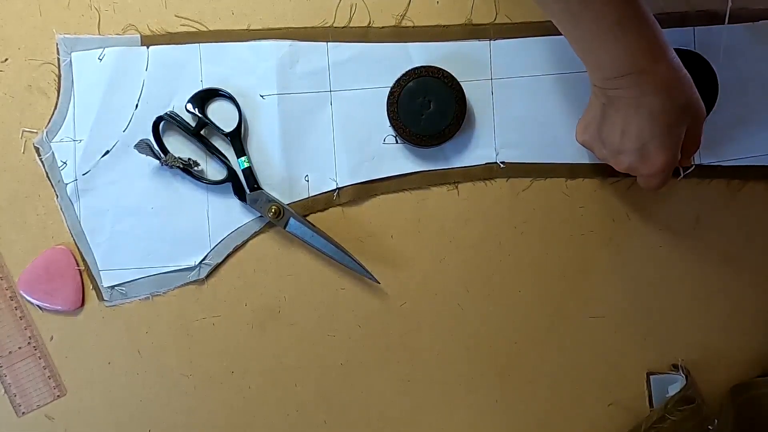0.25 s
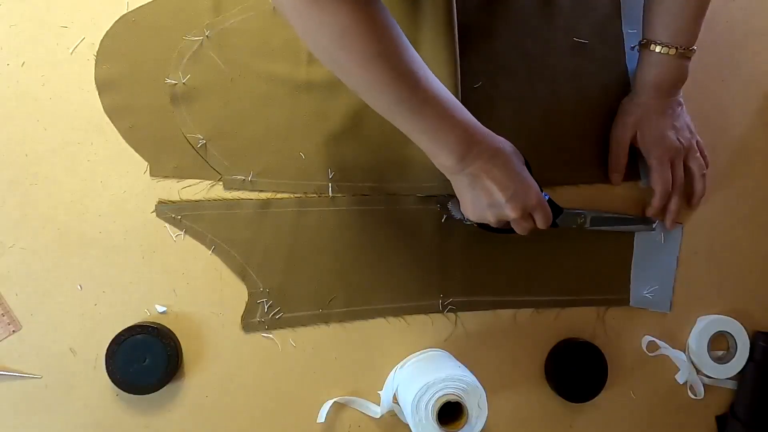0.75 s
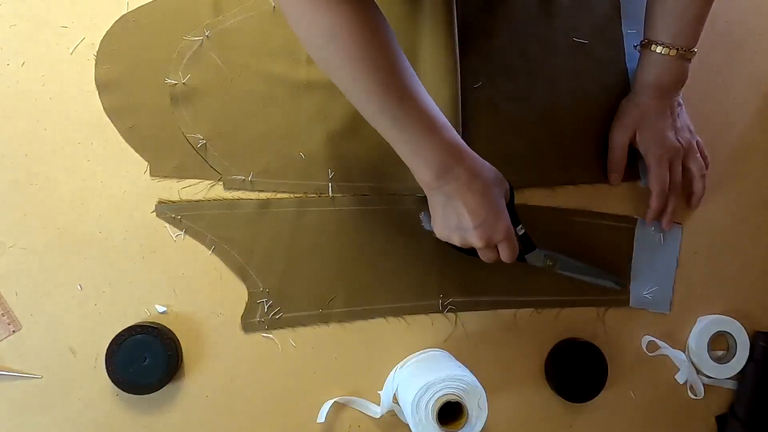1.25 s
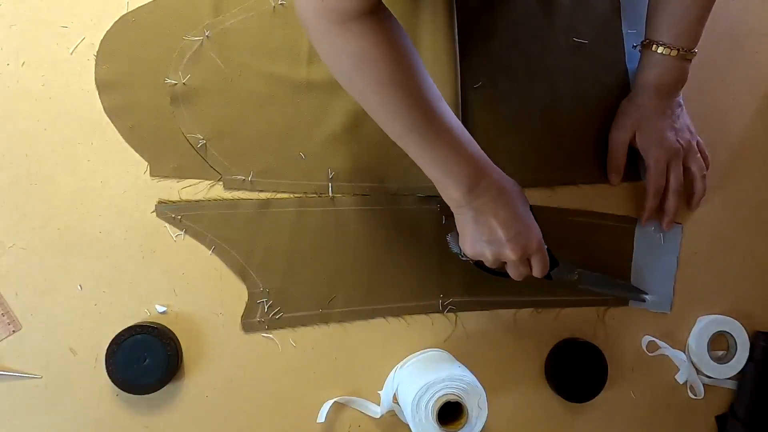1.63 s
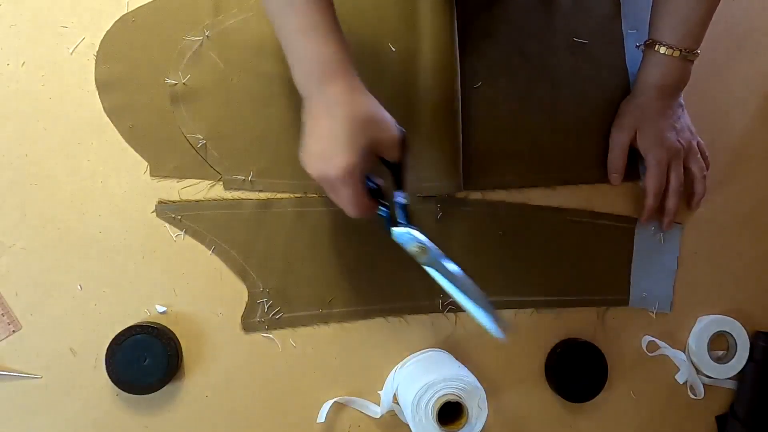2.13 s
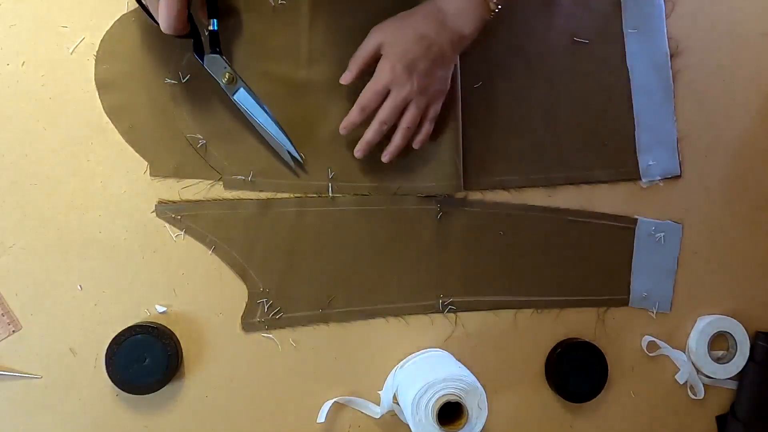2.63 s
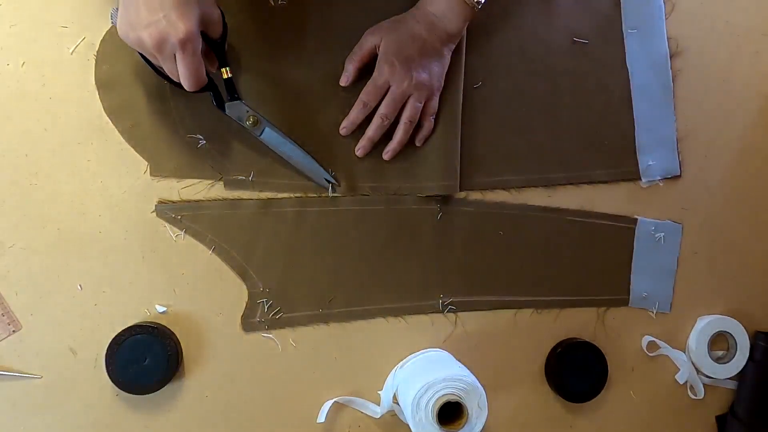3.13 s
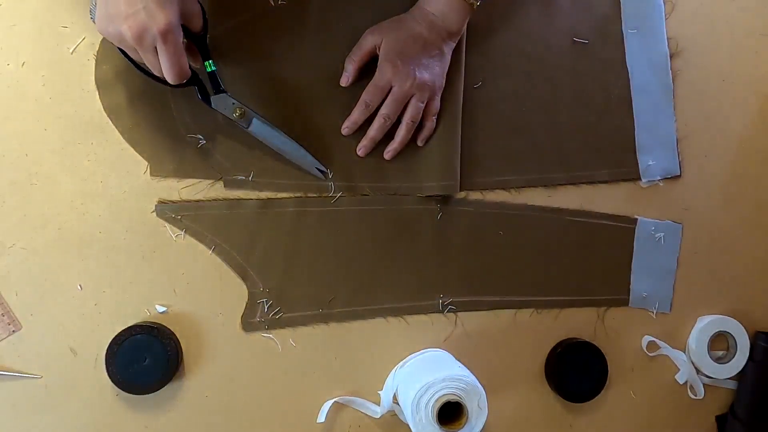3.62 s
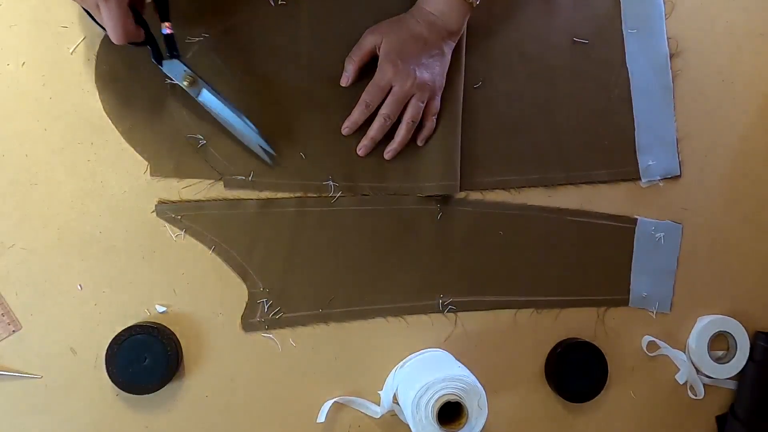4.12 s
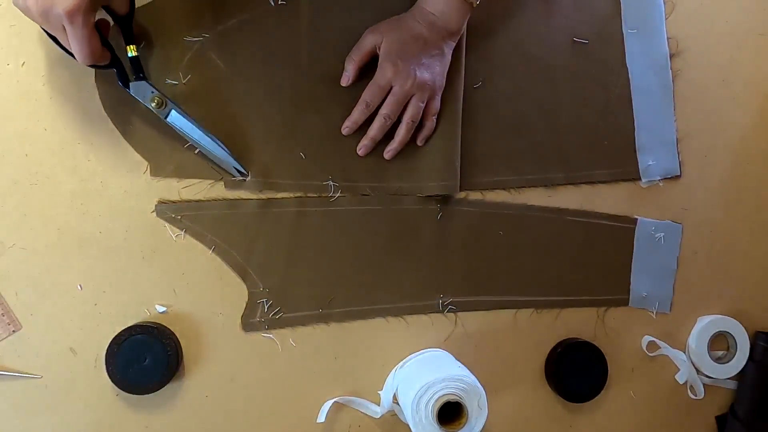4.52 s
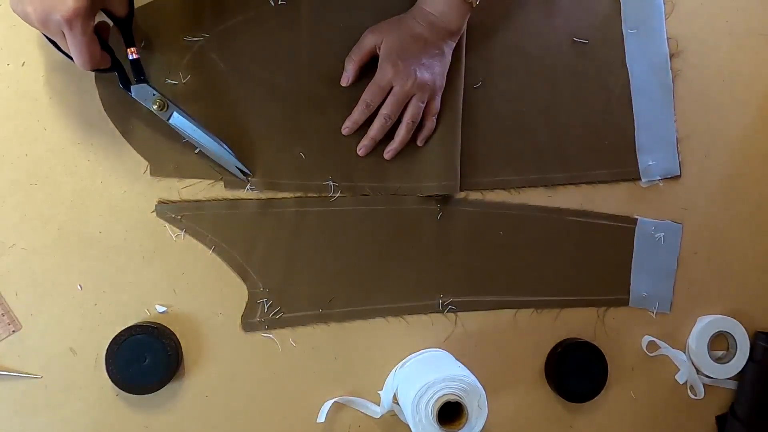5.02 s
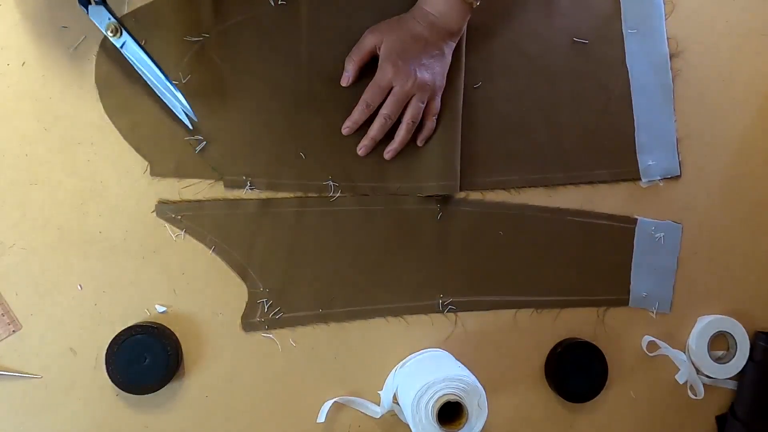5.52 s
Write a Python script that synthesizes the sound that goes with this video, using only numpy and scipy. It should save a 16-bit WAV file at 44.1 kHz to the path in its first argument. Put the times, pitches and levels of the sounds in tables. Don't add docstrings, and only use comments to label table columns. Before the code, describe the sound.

Sharp, dry scissor snips at uneven intervals, each followed by a brief steel scrape, over dull table knocks and faint fabric brushing indoors.

```python
import sys
import numpy as np
from scipy import signal
from scipy.fft import rfft, irfft
from scipy.io import wavfile
from scipy.ndimage import uniform_filter1d

SR = 44100
rng = np.random.default_rng(int(sys.argv[2]) if len(sys.argv) > 2 else 0)


def bounce(signal):
    frames = np.transpose(np.atleast_2d(signal))
    limited = np.clip(frames, -1, 1)
    pcm = np.round(limited * 32767).astype(np.int16)
    wavfile.write(sys.argv[1], SR, pcm)


def volts_from_db(level):
    exponent = np.asarray(level, float) / 20
    return 10 ** exponent


N = 254016

# time in seconds, peak level in dB,
# then the levels in dB against the middle blade modes of the handles (lowest modes), the blade roots (next
SNAPS = [
    (0.4736, -22.5, -12, -11, -1.5),
    (1.0983, -31.5, -9.5, -9.5, -0.5),
    (1.3701, -37.5, -34, -24.5, -1.5),
    (2.0033, -21.5, -13.5, -14, -1.5),
    (3.3893, -43, -4, -6, -2.5),
    (4.0598, -26, -17.5, -10.5, 2),
    (4.8918, -31.5, -19, -11.5, 2),
    (5.3669, -26, -15, -11, 4),
]
# frequency in Hz, level in dB, t60 in seconds, left minus right in dB.
BLADE_MODES = [(1020, -41.5, 0.036, 11), (1320, 2, 0.012, -3.5), (1674, 8, 0.0077, -1),
               (2173, 5, 0.016, 9.5), (2386, 10, 0.017, 1.5), (2572, 12.5, 0.0069, 2),
               (3236.5, -1.5, 0.017, 25), (3785, -6.5, 0.008, 12), (3990, 0, 0.054, 2.5),
               (4453, 2.5, 0.011, 4.5), (4730, 4.5, 0.01, 3.5), (5090, 1, 0.0151, 0.5),
               (5840, -1.5, 0.0109, 1), (6710, 3.5, .025, 1), (7043, -5.5, 0.0087, 19.5),
               (7670, -3, 0.0099, 13), (8537, 1.5, 0.016, -7), (8840, 5.5, 0.0095, -1.5),
               (9700, -1, .01, 1), (10330, -8.5, 0.024, -17.5), (12110, -5.5, 0.0088, -10.5),
               (14800, -20.5, .005, -17.5), (14100, -24.5, .004, -18.5)]
# time in seconds, delay of the left port in seconds.
PORT_LAG = [(0, 0.000061), (2.2, 0.000063), (2.8, 0.000045), (5.76, 0.000012)]


def clock():
    return np.arange(N) / SR


def unit(x):
    return x / np.sqrt(np.mean(x ** 2))


def curve(rows):
    rows = np.array(rows)
    out = np.zeros(N)
    span = slice(int(rows[0, 0] * SR), int(rows[-1, 0] * SR) + 1)
    out[span] = volts_from_db(np.interp(clock()[span], rows[:, 0], rows[:, 1]))
    return out


def strokes(times, db, rise_s, fall_s):
    out = np.zeros(N)
    for s, peak, up, down in np.broadcast(times, volts_from_db(db), rise_s, fall_s):
        first = max(int((s - 8 * up) * SR), 0)
        last = min(int((s + 8 * down) * SR), N)
        span = np.arange(first, last)
        growth = np.exp((s - span / SR) / up)
        decay = np.exp((span / SR - s) / down)
        out[span] += 2 * peak / (growth + decay)
    return out


def flicker(rate_hz, db):
    k = int(SR / rate_hz)
    held = np.repeat(rng.standard_normal(N // k + 1), k)
    return volts_from_db(db * uniform_filter1d(held, k)[:N])


def pair(alike):
    alike = np.clip(alike, 0, 1)
    mid, side = rng.standard_normal((2, N))
    return np.sqrt(1 + alike) * mid + np.sqrt(1 - alike) * side * np.array([[1], [-1]])


def colour(x, points):
    hz, db = np.transpose(points)
    log_f = np.log(np.fft.rfftfreq(N, 1 / SR) + 1)
    return irfft(rfft(x) * volts_from_db(np.interp(log_f, np.log(hz), db)), N)


def band(x, lo_hz, hi_hz):
    return signal.sosfilt(signal.butter(2, [lo_hz, hi_hz], "bandpass", fs=SR, output="sos"), x)


def ring(x, hz, *t60):
    shrink = np.log(1000) / (np.maximum(t60, .002) * SR)
    poles = np.exp(2j * np.pi * hz / SR - shrink)
    return signal.lfilter([np.prod(1 - np.abs(poles[1:]))], np.poly(poles), x)


def air():
    # frequency in Hz, level in dB per Hz.
    room_spectrum = [(88, -42), (150, -3.5), (216, -12.5), (262, -11), (495, -13.5), (802, -24.5),
                     (991, -18.5), (3030, -36), (3340, -43.5), (7500, -38.5), (15000, -55.5)]
    # frequency in Hz, left minus right in dB.
    ear_balance = [(60, -5.5), (110, 0), (200, -3.5), (380, -5), (700, -3), (1290, -3), (2380, 5.5),
                   (4400, 9.5), (8120, 0.5), (15000, -4)]
    hush = unit(colour(pair(0.24), room_spectrum)) * volts_from_db(-73 + 6.5) * flicker(4.8, 1.5)
    ears = []
    for noise, sign in zip(hush, (1, -1)):
        ears.append(colour(noise, [(hz, sign * db / 2) for hz, db in ear_balance]))
    return np.array(ears)


def cloth():
    # frequency in Hz, level in dB per Hz.
    fibre_spectrum = [(290, -43.5), (500, -12.5), (661, -13), (898, -12), (1000, -7.5), (1090, -7.5),
                      (1780, -7), (1930, -10), (2190, -9), (2900, -12.5), (4920, -10.5), (10300, -25),
                      (14000, -43.5)]
    # frequency in Hz, bandwidth in Hz, level in dB.
    fold_modes = [(987, 36, -2.5), (1534, 200, -3.5), (2003, 85, -2), (3220, 150, -1)]
    # peak time in seconds, length in seconds, level in dB, hiss against drag in dB.
    drag_events = [(0.053, 0.05, -82.5, 13), (0.483, 0.063, -61, -37), (0.735, 0.26, -72, 2.5),
                   (1.255, 0.055, -70.5, -1), (1.593, 0.15, -71.5, -3), (2.108, 0.25, -88.5, 6.5),
                   (2.44, .12, -58.5, -3.5), (2.617, 0.11, -64.5, -8), (2.94, 0.059, -76.5, -4),
                   (3.431, 0.26, -79.5, -11), (4.41, .1, -90.5, 18), (4.696, .1, -91, 7.5),
                   (5.119, .08, -93, 4), (5.368, 0.056, -66, -20.5)]
    s, length, db, hiss_db = np.transpose(drag_events)
    rise, fall = 0.61 * length, 0.77 * length
    drag = volts_from_db(-89.5) + strokes(s, db, rise, fall)
    hiss = volts_from_db(-85.5) + strokes(s - 0.86 * length, db + hiss_db, rise, fall)

    fibres = colour(pair(0.36) * flicker(170, 1.4), fibre_spectrum)
    dull = signal.lfilter(*signal.butter(2, 3000, "low", fs=SR), fibres)
    bright = signal.lfilter(*signal.butter(2, 3000, "high", fs=SR), fibres)
    folds = 0
    for hz, width, fold_db in fold_modes:
        tone = ring(dull, hz, .004 + 1 / width).imag
        folds = folds + volts_from_db(fold_db) * flicker(9, 2.5) * unit(tone)
    low = (unit(dull) + volts_from_db(-11) * folds) * drag * flicker(14, .8)
    high = unit(bright) * hiss * flicker(20, 1.5)
    return (low - high) * volts_from_db([[-.7], [-2.3]])


def thumps(push_s=0.0045, sway_s=0.0033):
    # time in seconds, peak level in dB,
    # stiffness in dB (on the upper modes), sway in dB (on the lowest modes).
    blows = [(0.482, -53, 7, 9.5), (0.655, -41, 1, 4.5), (0.74, -56.5, -4, 12), (0.877, -51.5, -9, -21),
             (1.367, -32.5, 4, 1), (1.999, -53.5, 0, 11), (2.304, -63, -10, 15.5), (2.854, -33, 1.5, -6.5),
             (2.88, -34.5, -20, -8), (3.39, -51, -7, -1), (3.566, -37.5, -3, -6), (3.592, -38, -36, 2),
             (3.639, -52, -20, 15.5), (3.979, -56, 0, 15), (4.083, -58.5, -5, 13.5), (4.321, -29.5, 2, -4),
             (4.348, -30.5, -6.5, -4), (4.89, -52.5, -8, -4), (5.382, -50.5, -1, 11.5),
             (5.7562, -39, 11.5, -13)]
    # frequency in Hz, level in dB, t60 in seconds.
    table_modes = [(46, -10.5, 0.28), (73.4, 3, 0.22), (100.5, -7, 0.046), (125.5, 0, 0.2), (152, 2, 0.12),
                   (221, 0.5, 0.089), (268, -5.5, 0.089), (356.4, 6.5, 0.018), (389.4, -5, 0.22)]
    push = np.hanning(int(push_s * SR))
    push = push / push.sum()
    out = np.zeros(N)
    for hz, mode_db, t60 in table_modes:
        frame = hz < 140
        drive = np.zeros(N)
        for s, db, stiff_db, sway_db in blows:
            extra_db = sway_db if hz < 90 else stiff_db if hz > 180 else 0
            drive[min(int((s + sway_s * frame) * SR), N - 1)] = volts_from_db(db + extra_db)
        sign = 1 if frame else -1
        out += sign * volts_from_db(mode_db) * ring(np.convolve(drive, push)[:N], hz, t60).imag
    return out


def table():
    # time in seconds, level in dB.
    hum_level = [(0.12, -65), (0.164, -45), (0.2, -38.5), (0.258, -41), (0.296, -38.5), (0.335, -38.5)]
    # time in seconds, level in dB.
    lean_level = [(0.0, -54), (0.51, -63), (0.67, -51.5), (1.15, -71.5), (1.47, -62), (2.44, -69),
                  (2.82, -60.5), (3.17, -71), (3.58, -62), (4.03, -69), (4.43, -63), (4.73, -68),
                  (5.1, -62.5), (5.76, -66.5)]
    hum = np.sqrt(2) * curve(hum_level) * np.cos(2 * np.pi * 65 * (clock() - .3244))
    lean = curve(lean_level)
    grip = strokes(np.array(SNAPS)[:, 0], -64.5, rise_s=0.025, fall_s=0.026)
    press = volts_from_db(-66.5) * unit(lean) ** 0.28 + grip
    sway = unit(band(band(pair(0.92), 33, 108.7), 20, 110)) * lean * flicker(10, 3.9)
    body = unit(band(band(pair(.6), 85, 330), 85, 330)) * press * flicker(25, 3.5)
    struck = (volts_from_db(2.0) * thumps() - hum) * volts_from_db([[.7], [-.7]])
    return struck + volts_from_db(6.0) * sway + volts_from_db(-1.0) * body


def knocks(decay_s=0.024):
    # time in seconds, peak level in dB.
    wood_hits = [
        (0.471, -43),
        (1.094, -46),
        (1.369, -51.5),
    ]
    noise, push = rng.standard_normal(N), 0
    for s, db in wood_hits:
        after = np.maximum(clock() - s, 0)
        push = push + volts_from_db(db) * (after > 0) * np.exp(-after / decay_s)
    return band(noise * push, 130, 950) * volts_from_db(10)


def walls(x, t60_low=0.092, t60_high=0.044, wet_db=-9, gap_s=0.0045):
    t = np.arange(int(.5 * SR)) / SR
    noise = rng.standard_normal((2, len(t))) * (t > gap_s)
    low = band(noise, 300, 5400) * 1000 ** (-t / t60_low)
    high = band(noise, 5000, 15000) * 1000 ** (-t / t60_high)
    tail = low + high
    tail = tail / np.sqrt(np.sum(tail ** 2) / 2)
    return volts_from_db(wet_db) * signal.fftconvolve(x, tail, axes=1)[:, :N]


def ports(z, hz, pan_db, lag_s):
    side = np.array([[1], [-1]])
    return volts_from_db(side * pan_db / 2) * (z * np.exp(-1j * side * np.pi * hz * lag_s)).imag


def slips(rows, rise_s, rasp_s, blade_s, late_s, roots_db):
    s, db, bright_db = np.transpose(rows)
    weaker_db = roots_db - 0.48 * bright_db
    roots = strokes(s + late_s, db + weaker_db, rise_s, blade_s)
    blade = strokes(s + late_s, db, rise_s, blade_s)
    edges = strokes(s, db + bright_db, rise_s, rasp_s)
    return np.array([roots, blade, edges])


def squeak():
    # start in seconds, length in seconds, first frequency in Hz, last frequency in Hz, level in dB.
    pivot_squeak = (2.383, .026, 3720, 3950, -57)
    s, length, from_hz, to_hz, db = pivot_squeak
    part = np.clip((clock() - s) / length, 0, 1)
    phase = 2 * np.pi * np.cumsum(from_hz + (to_hz - from_hz) * part) / SR
    return volts_from_db(db) * np.sin(np.pi * part) * np.sin(phase)


def scrapes():
    # time in seconds, level in dB, edge brightness in dB.
    closings = [(0.455, -67.5, 14), (1.072, -55.5, -3), (1.984, -53, -3.5), (3.357, -59.5, 3),
                (3.373, -64.5, -0.5), (4.025, -60.5, 7), (4.050, -58.5, 1.5), (4.843, -65, 6.5),
                (4.874, -57.5, 6.5), (5.330, -62.5, 4.5), (5.352, -67, 11.5)]
    # time in seconds, level in dB, edge brightness in dB.
    openings = [
        (0.631, -53.5, 4),
        (1.230, -56, 2),
        (2.213, -53.5, 1),
        (3.524, -56, 5.5),
        (4.208, -55.5, 5.5),
        (5.037, -56, 6.5),
        (5.521, -56, 4.5),
    ]
    grit = rng.standard_normal(N) * flicker(500, 4.5) * flicker(130, 1.8)
    shut = slips(closings, rise_s=.007, rasp_s=.006, blade_s=.009, late_s=0, roots_db=-14)
    spring = slips(openings, rise_s=.003, rasp_s=.009, blade_s=.014, late_s=.005, roots_db=-15)
    drive = grit * (shut + spring)
    early = clock() < 2.5
    out = 0
    for hz, mode_db, t60, pan_db in BLADE_MODES[3:]:
        t60 = min(t60, .012, 3e5 / hz ** 2 + .002)
        region = int(hz > 3500) + int(hz > 7000)
        z = ring(drive[region], hz, t60, .002) / np.sqrt(t60 * SR / np.log(1e6))
        before = ports(z[early], hz, pan_db, PORT_LAG[0][1])
        after = ports(z[~early], hz, pan_db, PORT_LAG[-1][1])
        rasp_db = .4 * max(hz / 1000 - 9, 0)
        out = out + np.hstack([before, after]) * volts_from_db(mode_db - 6.0 + rasp_db)
    return out + squeak()


def snaps(contact_s=.0007, tail_s=0.02, tail_db=-13, dulling=0.26, scatter_db=1.5, alike=0.16):
    region_edges = [1800, 3500, 6000]
    t = np.arange(8000) / SR
    out = np.zeros((2, N))
    for s, db, handles_db, roots_db, edges_db in SNAPS:
        crack, mid, side, rattle = rng.standard_normal((4, len(t)))
        luck, detune = rng.standard_normal((2, len(BLADE_MODES)))
        crack = crack * np.abs(crack) * t / contact_s * np.exp(1 - t / contact_s)
        echoes = mid + np.sqrt(1 - min(alike, 1)) * side * np.array([[1], [-1]])
        echoes = echoes * (1 - np.exp(-t / 0.0021))
        echoes = echoes * volts_from_db(3.5 * np.repeat(rattle, 60)[:len(t)])
        lag_s = np.interp(s, *np.transpose(PORT_LAG))
        echo_db = tail_db + 0.2 * (roots_db + 16)
        i = int(s * SR)
        for hz, mode_db, t60, pan_db, chance, off in np.column_stack([BLADE_MODES, luck, detune]):
            fade = np.exp(-t / tail_s * (hz / 4000) ** dulling)
            first = ring(crack, hz * (1 + .012 * off), min(t60, .03, 100 / hz), .002)
            short = min(t60, .025, 3e5 / hz ** 2 + .002)
            later = ring(echoes * fade, hz * (1 + .02 * off), short, .002)
            later = later / np.sqrt(short * SR / np.log(1e6))
            z = (first / np.abs(first).max() + volts_from_db(echo_db) * later) * volts_from_db(scatter_db * chance)
            region_db = (handles_db, roots_db, 0, edges_db)[np.searchsorted(region_edges, hz)]
            out[:, i:i + len(t)] += ports(z, hz, pan_db, lag_s) * volts_from_db(db + region_db + mode_db - 7.0)
    return out


def shears():
    scrape = scrapes()
    return band(snaps(), 850, 18000) + scrape + walls(scrape)


def scene():
    return shears() + knocks() + table() + cloth() + air()


def top_cut(x):
    return signal.sosfilt(signal.butter(12, 16320, fs=SR, output="sos"), x)


def record(dry):
    cut_s, back_s, fade_s = .3226, .338, .018
    t = clock()
    fade_in = np.clip((t - back_s) / fade_s, 0, 1) ** 2
    gate = np.where(t < cut_s, 1, fade_in)
    dry = signal.sosfilt(signal.butter(2, 35.5, "high", fs=SR, output="sos"), dry)
    mix = signal.sosfilt(signal.ellip(6, .3, 60, 15400, fs=SR, output="sos"), dry * gate)
    return top_cut(mix)


dry = scene()
out = record(dry)
bounce(out)
```